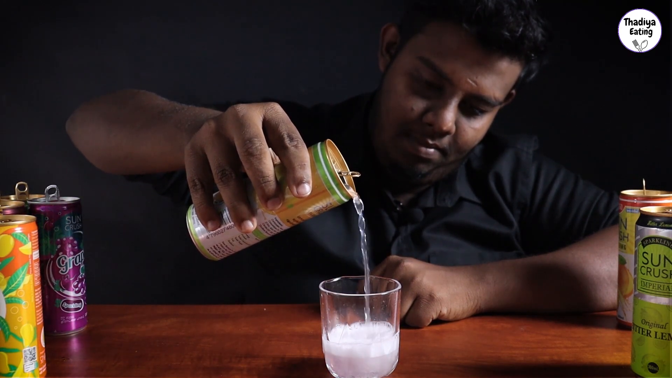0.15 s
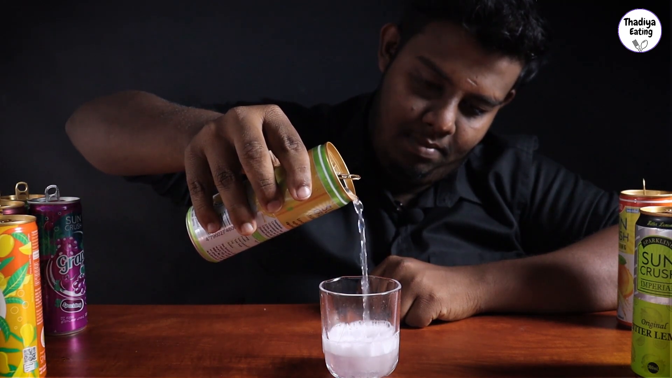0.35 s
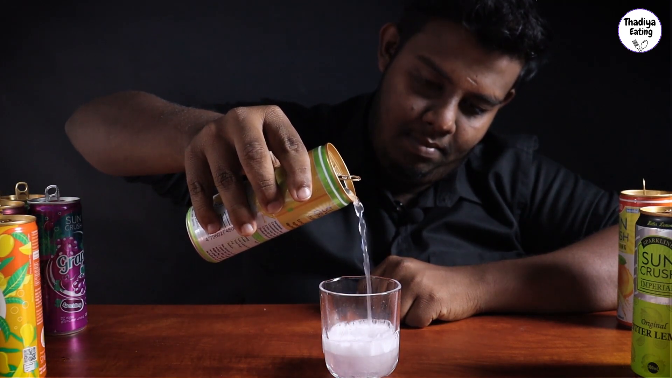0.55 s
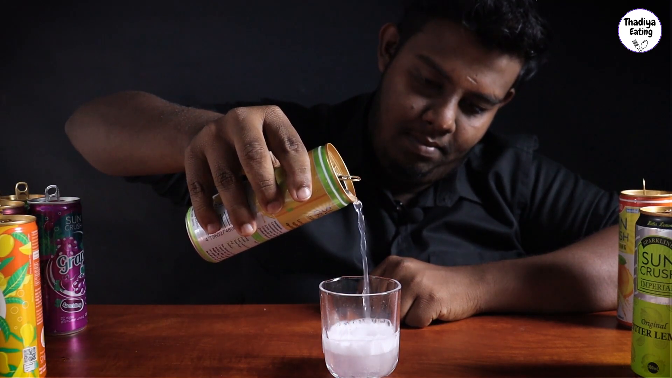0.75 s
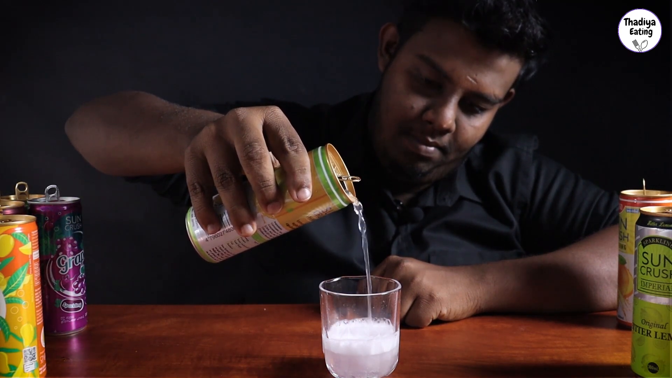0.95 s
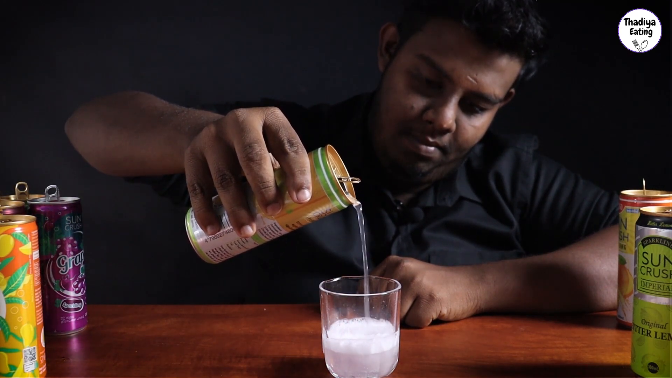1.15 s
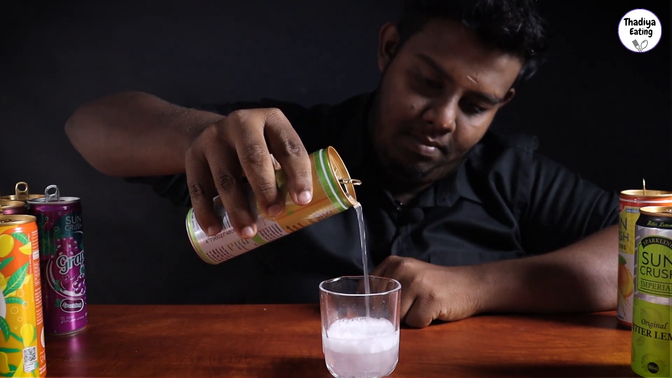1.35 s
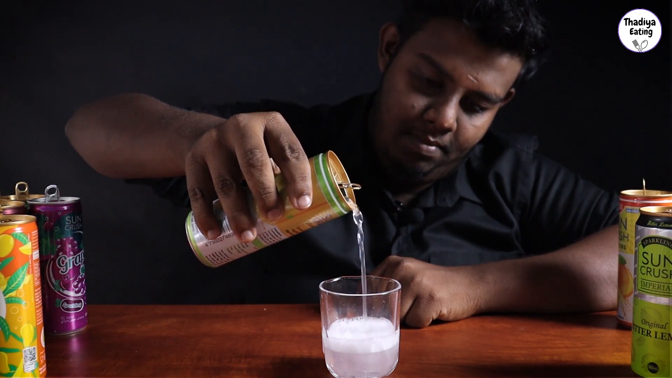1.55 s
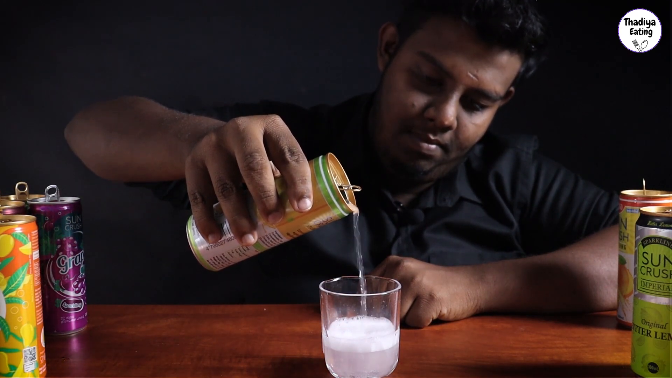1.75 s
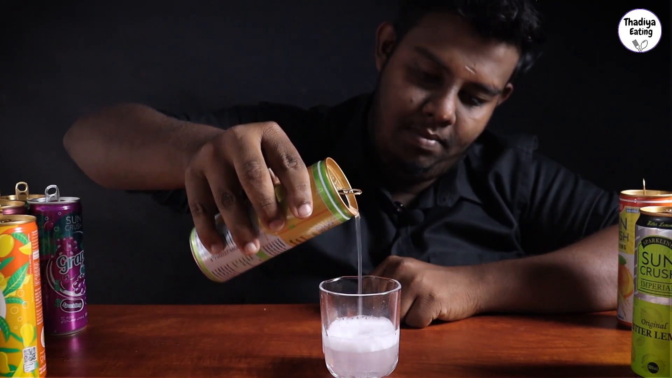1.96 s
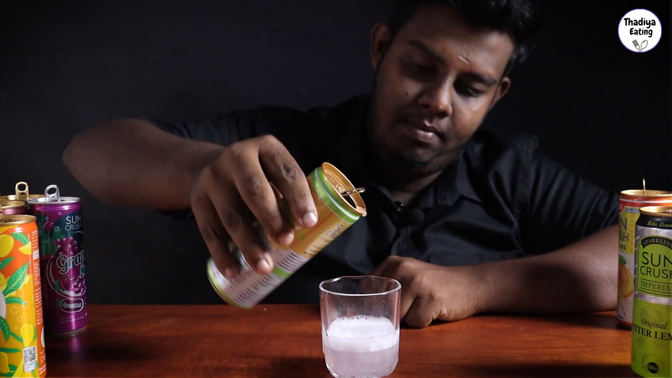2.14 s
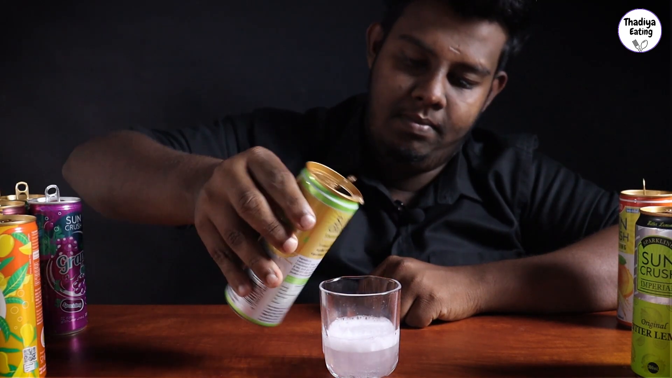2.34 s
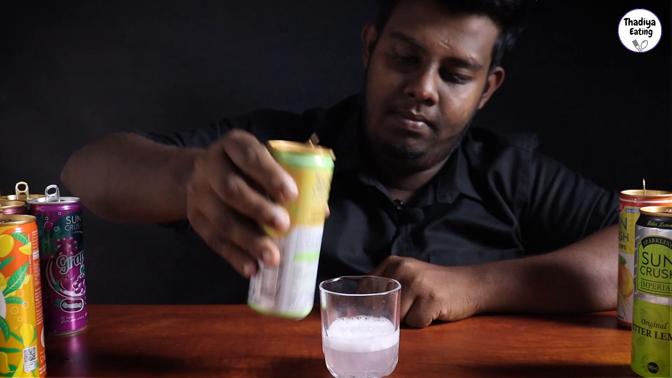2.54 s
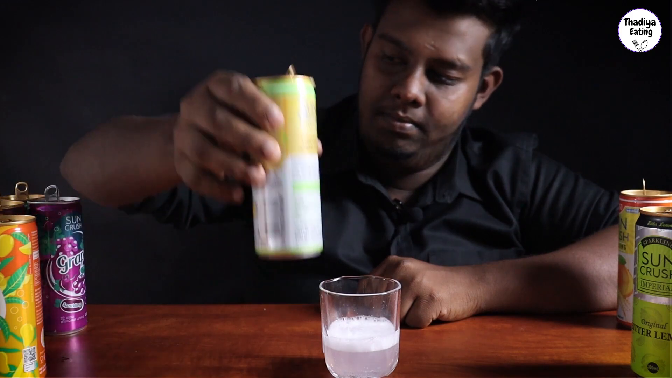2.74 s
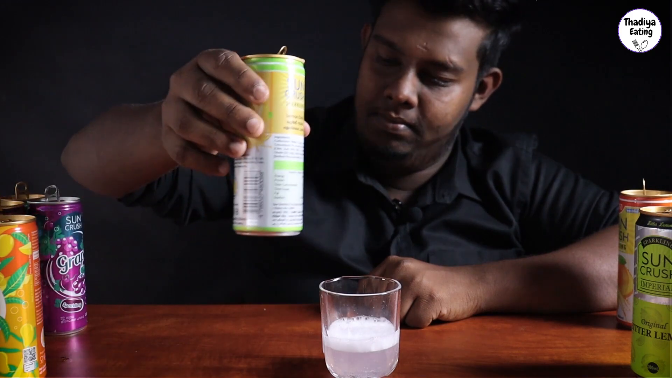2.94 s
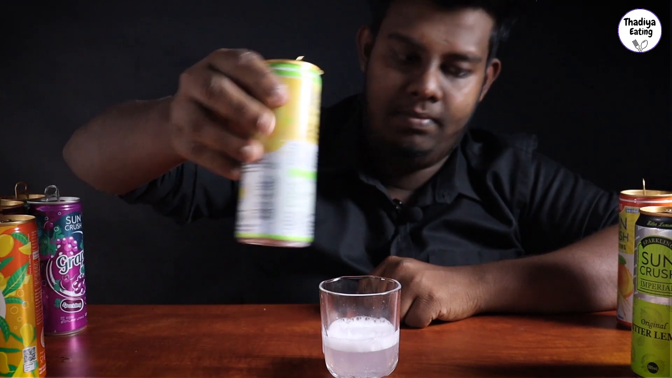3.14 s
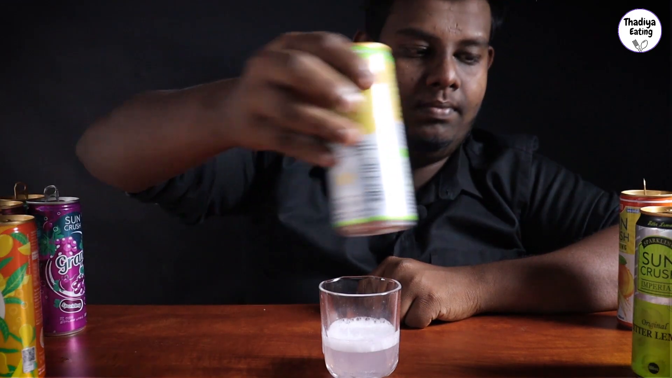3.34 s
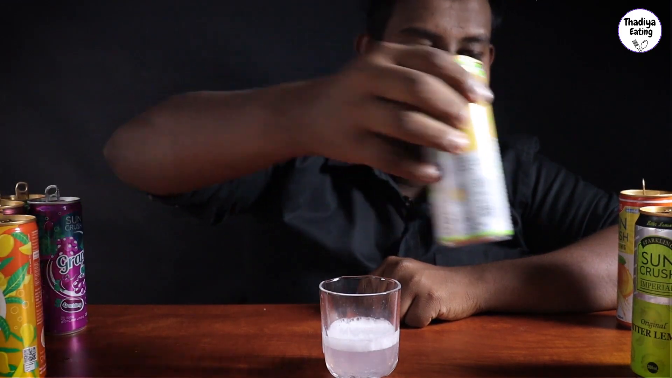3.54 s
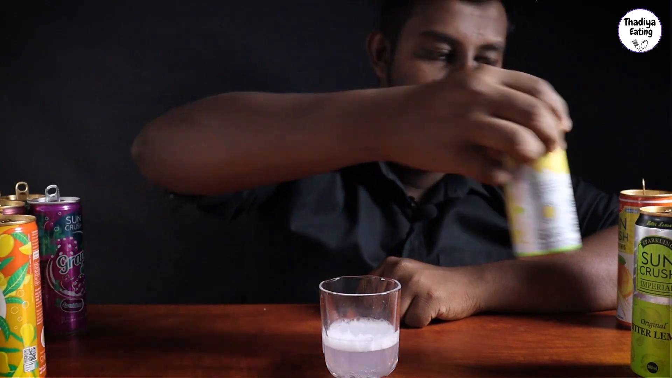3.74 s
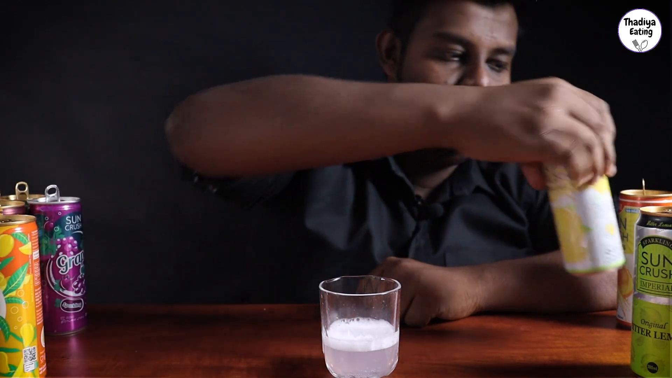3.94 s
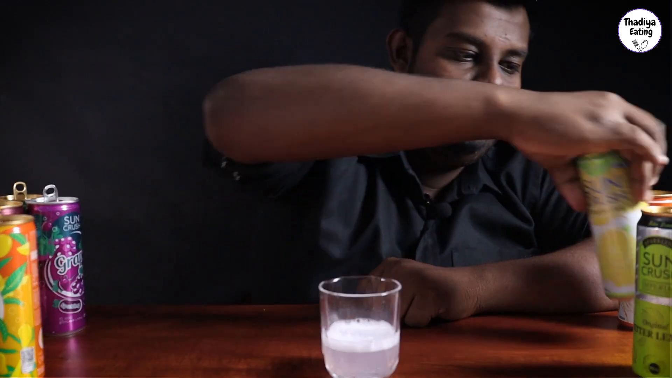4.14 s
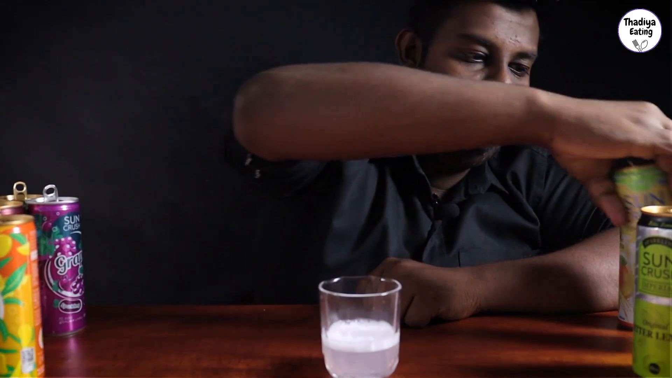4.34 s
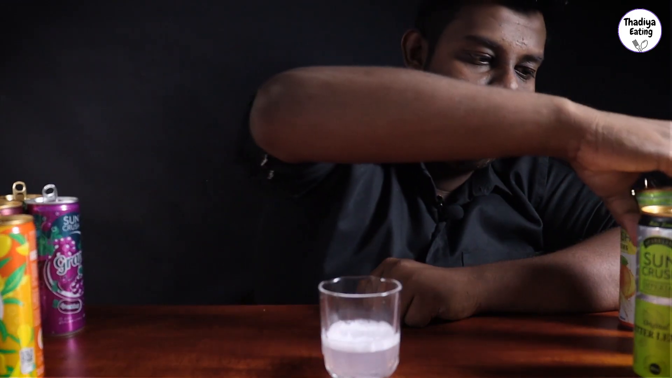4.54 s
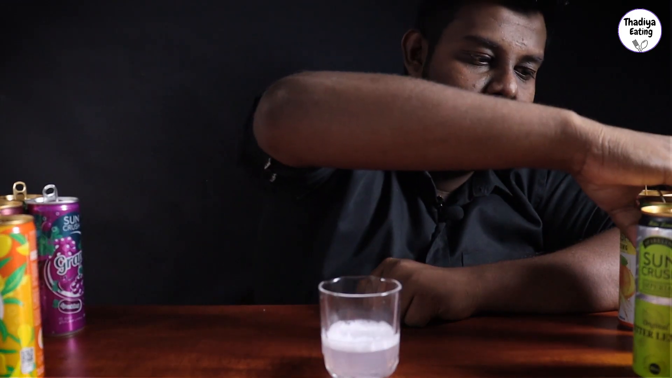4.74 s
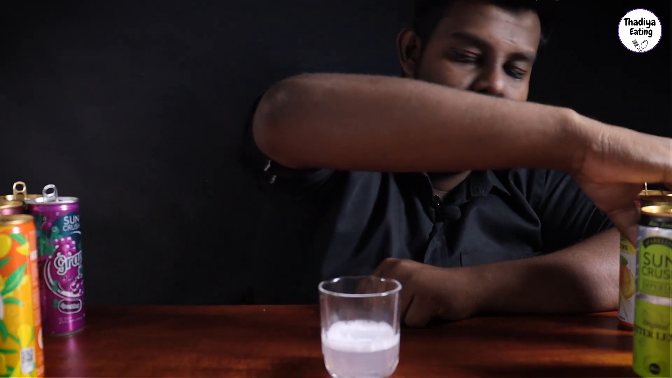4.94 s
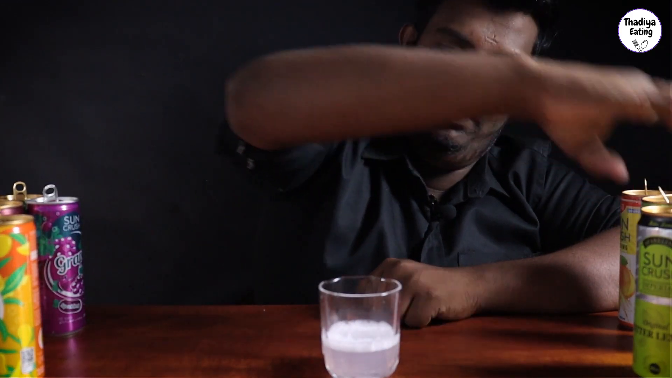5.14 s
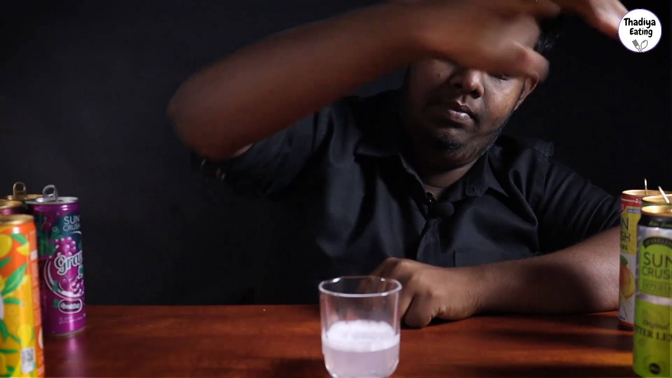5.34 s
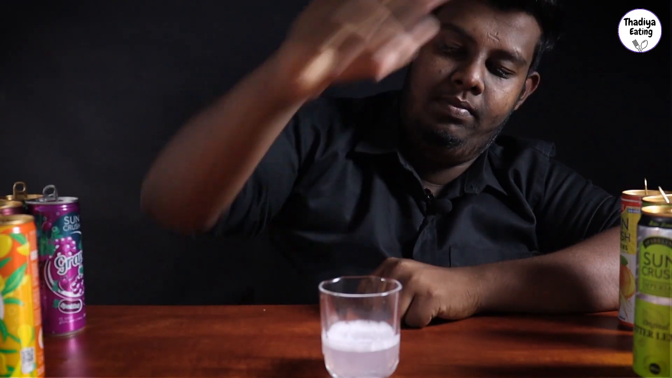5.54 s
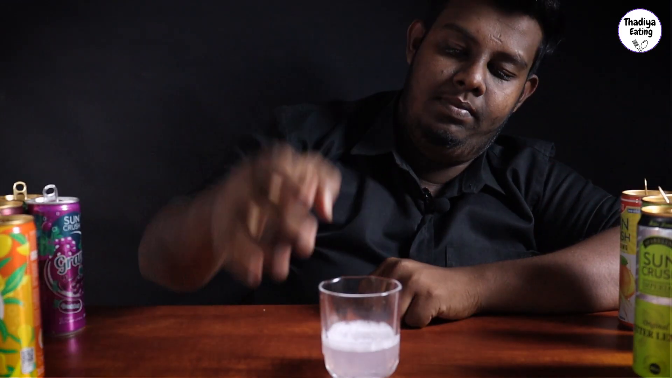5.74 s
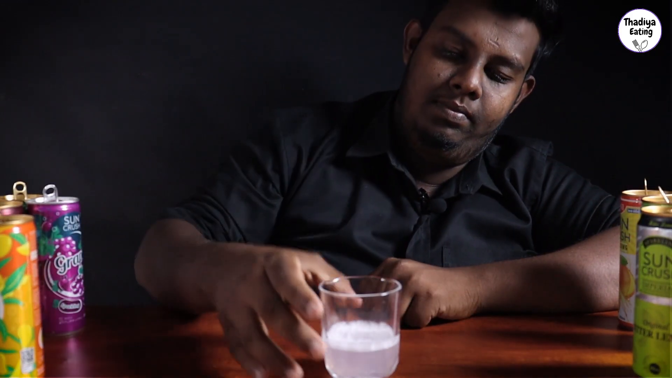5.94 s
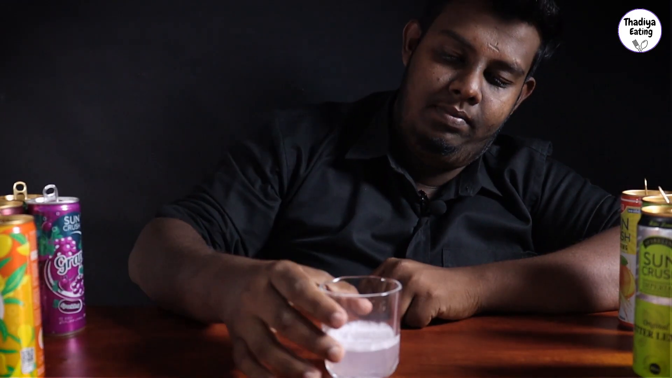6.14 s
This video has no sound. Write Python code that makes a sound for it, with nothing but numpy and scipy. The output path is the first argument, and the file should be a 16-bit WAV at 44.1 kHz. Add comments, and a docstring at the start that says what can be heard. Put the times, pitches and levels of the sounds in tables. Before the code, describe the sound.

Bubbly pouring with crisp fizz thins out and ends, a hollow tinny double click follows, then a loud can-on-wood knock that rings briefly.

```python
"""Soda runs from a can into a half-full tumbler: trapped air plops and small bubbles ring under fizzing foam.
The stream breaks off and its last bubbles die away; then the can's thin wall pops back in two steps.
The can lands hard on a wooden table in quick contacts, its rim chatters and the table rings on.
It settles once more, and a few faint soft tones follow. Room noise and a rustling shirt lie underneath.
A small room answers the sounds, and the recorder's limiter ducks loud moments such as the knock."""
import sys
import numpy as np
from scipy import signal
from scipy.fft import rfft, irfft, next_fast_len
from scipy.io import wavfile
from scipy.ndimage import uniform_filter1d, minimum_filter1d, map_coordinates

SR = 44100
rng = np.random.default_rng(int(sys.argv[2]) if len(sys.argv) > 2 else 0)


def transcribe(signal):
    """Save signal, clipped to [-1, 1], as a 16-bit WAV file at the path in sys.argv[1]."""
    frames = np.atleast_2d(signal).T
    limited = np.clip(frames, -1, 1)
    pcm = np.round(limited * 32767).astype(np.int16)
    wavfile.write(sys.argv[1], SR, pcm)


N = 272979  # length of the scene in samples

# Table levels are relative: the functions below add trims and filters to them.
# Room noise: [f/Hz, level/dB per Hz]
AIR_SPECTRUM = [(20, -13), (60, -6), (130, -7.5), (260, -6.5), (450, -11), (800, -15.5), (1100, -17),
                (1400, -10.5), (1900, -20.5), (2600, -27.5), (3800, -22.5), (6000, -22.5), (8500, -24.5),
                (11500, -26.5), (16000, -34.5)]
# Low rumble: [f/Hz, level/dB per Hz]
RUMBLE_SPECTRUM = [(20, -9), (38, -8), (70, -11.5), (150, -58.5), (400, -100)]
# Arm movements that rustle the shirt: [t/s of the peak, width/s (standard deviation), level/dB]
ARM_MOVES = [(2.4, .3, -68), (3.378, 0.12, -61), (4.25, .4, -60), (5.145, 0.33, -62), (5.733, 0.24, -61.5)]
# Colour of the shirt's rustle: [f/Hz, level/dB per Hz]
CLOTH_SPECTRUM = [(60, -2.5), (130, 10.5), (300, 13), (700, 2.5), (2500, -1.5), (6500, -5.5),
                  (11000, -14.5), (15000, -12)]
# Strength of the stream, surging as the can gulps air: [t/s, level/dB]
STREAM_FLOW = [(0, -36), (0.3, -34), (0.56, -36.5), (0.76, -39.1), (0.86, -40), (1.02, -45), (1.07, -37),
               (1.14, -37.5), (1.19, -48), (1.3, -44.5), (1.42, -41), (1.5, -46.5), (1.64, -44.5),
               (1.71, -44), (1.83, -41.5), (1.93, -51.5), (2.18, -57)]
# Large air pockets trapped by the stream: [t/s, low mode level/dB, high mode level/dB, low mode f/Hz]
LARGE_POCKETS = [(0.1061, -18, -13, 580), (0.1128, -20, -33, 603), (.1328, -26, -22, 606),
                 (.145, -21, -22.5, 580), (0.225, -18, -21, 580), (.3473, -22, -26.5, 770),
                 (0.4612, -11, -12, 604), (0.4952, -24, -47, 543), (0.6008, -27, -21.5, 570),
                 (0.6414, -22.5, -33, 626), (0.7031, -25, -19, 635), (.787, -20.5, -25, 620),
                 (0.8884, -24.5, -36, 576), (.893, -38, -23.5, 625), (0.9245, -28.5, -27.5, 590),
                 (0.964, -35, -26.5, 560), (0.983, -28.5, -23.5, 694), (0.9997, -52, -29, 660),
                 (1.2091, -38.5, -30.5, 550), (1.329, -43, -35, 605), (1.355, -19.5, -22.5, 875),
                 (1.3735, -24, -36, 910), (1.5404, -31, -32.5, 626), (1.5758, -30.5, -20, 560),
                 (1.6822, -43, -40, 690), (1.7339, -33, -27.5, 720), (1.7845, -25.5, -26, 483),
                 (1.8007, -28.5, -28, 516), (1.839, -31, -31, 497), (1.993, -57, -32, 690),
                 (2.0362, -41.5, -33.5, 603), (2.178, -55, -38.5, 550)]
# Bursting foam: [f/Hz, level/dB per Hz]
FIZZ_SPECTRUM = [(1800, -20.5), (2900, -23), (3800, 10), (4400, -3), (5000, 1.5), (6500, -9), (8500, 1.5),
                 (9400, 0.5), (11000, -12), (13000, 2.5), (15500, -13.5)]
# Resonances of the air in can and glass: [f/Hz, width/Hz, level/dB]
HOLLOW_MODES = [(210, 11, 7.5), (285.5, 40, -5), (479.9, 13, 0.5), (508.5, 13, 1.5)]
# Tiny sharp ticks: [t/s, level/dB, f/Hz]
TICKS = [(0.1062, -30, 4900), (0.168, -32.5, 8600), (0.255, -53, 4000), (0.4604, -26, 13700),
         (0.4612, -29, 8600), (0.7033, -37.5, 4500), (0.9647, -40, 3720), (1.4027, -38, 13200),
         (1.7662, -37, 12800), (5.5164, -41, 4500)]
# The can wall springs back in two steps: [t/s, push level/dB, metal level/dB]
WALL_POPS = [(2.7252, -8, -5.5), (2.7345, -1.5, -14.5)]
# Ringing modes of the can's shell and of the air inside it: [f/Hz, level/dB, t60/s]
CAN_MODES = [(265, -9, .07), (608, -22, .28), (1180, -33, .25), (2200, -12.5, .105), (2616, -36, .1),
             (2724, -46, .22), (3262, -34, .1), (3704, -43, .08), (4950, -41, .07), (6121, -41, .12),
             (7036, -40, .13), (7250, -41, .12), (9313, -42, .15), (9630, -42, .1), (14430, -45, .08)]
# Colour of the wall's snap: [f/Hz, level/dB per Hz]
SNAP_SPECTRUM = [(100, -13.5), (250, 14.5), (650, 6), (1000, 10.5), (1600, -8.5), (2400, -8.5), (4300, -24),
                 (5500, -6), (7500, -5.5), (8500, -21.5), (15000, -21)]
# Contacts of can and table: [t/s, peak level/dB, crack level/dB against the thud]
CONTACTS = [(4.808, 11.5, 2), (4.8132, 5.5, -9), (4.8183, 3.5, -19.5), (5.033, -30.5, -10)]
# Colour of the hard contact: [f/Hz, level/dB per Hz]
CRACK_SPECTRUM = [(60, -24.5), (200, -9), (550, 3.5), (1000, -2), (1500, -12), (2000, -18.5), (3000, -26.5),
                  (4500, -38.5), (6000, -35.5), (9000, -57.5), (16000, -52)]
# Ringing modes of the table top and what stands on it: [f/Hz, level/dB, t60/s]
TABLE_MODES = [(212, -24, 0.45), (330, -24, 0.39), (388, -21, 0.37), (482, -33, 0.51), (558, -15.5, 0.15),
               (612, -27.5, 0.4), (727, -18, 0.47), (807.6, -19.5, 0.46), (915, -29, .45),
               (1017, -21.5, 0.24), (1143, -33, .4), (1475, -37.5, 0.39), (1841, -31, 0.22),
               (2650, -41, 0.17), (3580, -35, 0.11), (6000, -33, 0.07)]
# Dense ringing of the table: [f/Hz, level/dB per Hz]
RATTLE_SPECTRUM = [(41, -54.5), (70, -18.5), (118, -8), (166, -10.5), (200, -13.5), (285, -19.5),
                   (327, -13), (552, 1.5), (843, -7), (902, -13.5), (4000, -57.5), (5200, -82.5),
                   (8800, -120)]
# Colour of the rocking rim: [f/Hz, level/dB per Hz]
CHATTER_SPECTRUM = [(300, -19), (700, 13), (1200, 5.5), (1600, -9), (1900, -7), (2250, -26.5),
                    (2700, -15.5), (3400, -36), (5000, -46), (12000, -65.5)]
# Faint soft tones: [t/s of the peak, width/s (standard deviation), f/Hz at the peak, glide/Hz per s, level/dB]
SOFT_TONES = [(5.135, 0.049, 337, -82, -41), (5.426, 0.053, 349.4, -4, -47),
              (5.854, 0.039, 423.6, 86, -44.5), (5.993, .02, 424, 0, -57.5),
              (6.175, 0.027, 496, 701.5, -53.5)]
# How long the room's diffuse tail lasts: [f/Hz, t60/s]
ROOM_DECAY = [(100, .5), (400, 0.34), (1500, 0.25), (5000, 0.25), (14000, 0.18)]
# Low room modes: [f/Hz, width/Hz, level/dB]
ROOM_MODES = [(89, 5, 4), (120, 6, 3), (203.9, 5, 2.5), (282, 35, -8.5), (405, 6.8, -7.5), (430, 6, -4.5),
              (477, 15, -0.5), (570, 9, -8.5), (620, 3.3, -11)]

POCKET_HZ, POCKET_SPREAD = 1392, 0.028  # high mode of large and dribbling pockets, and its relative scatter
GLASS_AIR_HZ = 507  # the air above the drink
SPLASH_DB = -27  # spray of a large pocket, against the high mode in its table row
DRIBBLE_PER_S, DRIBBLE_SPREAD = 45, 0.2  # small pockets: average rate, relative scatter of the low mode
DRIBBLE_DB, DRIBBLE_SCATTER_DB = 4, 1.5  # small pockets: overall gain, scatter in level
FULL_FLOW_DB, HIGH_FOLLOWS = -38, 0.62  # highs follow only this share of each dB away from full flow
STOP_S, DRAIN_DB_PER_S = 2.2, 44  # when the stream breaks off, and how fast the last bubbles die away
ROCK_DB, ROCK_RISE_S = -28, 0.012  # the can rocks on its rim: level and build-up
ROCK_HOLD_S, ROCK_FADE_DB_PER_S = 0.077, 217  # fade starts this long after landing, at this speed
LEAD = 64  # samples left for a puff to build up
TOP_HZ = 15900  # the recorder keeps nothing from here up


def amp(db):
    """Decibels to gain."""
    return 10 ** (np.asarray(db) / 20)


def unit(x):
    """Scale to an rms (average strength) of 1."""
    return x / np.sqrt(np.mean(x ** 2) + 1e-20)


def along(points, hz):
    """Read a curve of (Hz, value) points at hz, on a log frequency axis."""
    f, values = np.transpose(points)
    return np.interp(np.log(hz + 1), np.log(f + 1), values)


def wobble(rate):
    """A smooth random curve through rate random points a second."""
    knots = rng.standard_normal(int(N * rate / SR) + 4)
    return map_coordinates(knots, [np.arange(N) * rate / SR])


def filtered(x, response):
    """Multiply the spectrum of x by a response that depends on frequency."""
    size = next_fast_len(len(x) + SR // 2)
    hz = np.fft.rfftfreq(size, 1 / SR)
    return irfft(rfft(x, size) * response(hz), size)[:len(x)]


def noise(spectrum, size=N):
    """Coloured noise of rms 1."""
    return unit(filtered(rng.standard_normal(size), lambda hz: amp(along(spectrum, hz))))


def high_pass(x, hz, order):
    """Weaken what lies under hz."""
    return signal.sosfilt(signal.butter(order, hz, "high", fs=SR, output="sos"), x)


def resonate(x, modes):
    """Let x drive a set of resonances, each strongest at its own centre frequency."""
    def response(f):
        total = 0
        for centre, width, db in modes:
            damping = 1j * f * width
            total = total + amp(db) * damping / (centre ** 2 - f ** 2 + damping)
        return total
    return filtered(x, response)


def add(track, s, sound):
    """Mix a sound into the track at time s, cut off where the track ends."""
    room_left = track[max(round(s * SR), 0):][:len(sound)]
    room_left += sound[:len(room_left)]


def swelling(s, width_s):
    """A bell-shaped gain that peaks at time s."""
    return np.exp(-0.5 * ((np.arange(N) / SR - s) / width_s) ** 2)


def blip(t, hz, swell):
    """A heavily damped oscillation whose envelope reaches 1 after swell seconds."""
    envelope = t / swell * np.exp(1 - t / swell)
    return np.sin(2 * np.pi * hz * t) * envelope


def burst(spectrum, t60):
    """A coloured puff of noise that starts at about rms 1, LEAD samples in, and dies away."""
    t = np.arange(SR // 8) / SR
    puff = rng.standard_normal(len(t)) * amp(-60 * t / t60)
    return filtered(np.pad(puff, (LEAD, 0)), lambda hz: unit(amp(along(spectrum, hz))))


def ring(t, modes):
    """Freely decaying modes, each set off in a random direction."""
    out = np.zeros(len(t))
    for hz, db, t60 in modes:
        out += rng.choice([-1, 1]) * amp(db - 60 * t / t60) * np.sin(2 * np.pi * hz * t)
    return out


def dying(x, decay):
    """Each frequency of x fades by 60 dB in its own t60."""
    hz, t, cells = signal.stft(x, SR, nperseg=256)
    faded = cells * amp(-60 * t / along(decay, hz)[:, None])
    return signal.istft(faded, SR, nperseg=256)[1][:len(x)]


def room_noise():
    """Steady coloured air noise and thin top hiss, over a rumble of uneven strength."""
    air = amp(-59.5) * noise(AIR_SPECTRUM)
    lumps = amp(9 * np.tanh(wobble(14)))
    rumble = amp(-68.5) * unit(noise(RUMBLE_SPECTRUM) * lumps)
    hiss = amp(-63.0) * noise([(11900, -64.5), (12300, 6.5), (15800, 1.5)])
    return air + rumble + hiss


def shirt():
    """Cloth rubs as the arm moves: flickering noise that swells with each movement."""
    power = sum((amp(db) * swelling(s, width_s)) ** 2 for s, width_s, db in ARM_MOVES)
    return np.sqrt(power) * noise(CLOTH_SPECTRUM) * amp(2 * wobble(25))


def pocket(low, high, low_hz, high_hz, air_db=-4, low_swell=0.00113, high_swell=0.0014):
    """An air pocket rings briefly in two modes, damped by the foam, and pushes the air above the drink."""
    t = np.arange(SR // 25) / SR
    low_mode = amp(low) * blip(t, low_hz, low_swell)
    high_mode = amp(high) * blip(t, high_hz, high_swell)
    glass_air = amp(low + air_db) * blip(t, GLASS_AIR_HZ, low_swell)
    return low_mode + high_mode + glass_air


def dribble(low_db, high_db, hz=620, low_offset_db=-4, count=120):
    """The rippling stream traps small pockets at uneven intervals; their strength follows the flow."""
    out = np.zeros(N)
    times = np.cumsum(rng.uniform(0.4, 1.6, count)) / DRIBBLE_PER_S
    for s, (low, high, low_pitch, high_pitch) in zip(times, rng.standard_normal((count, 4))):
        i = min(int(s * SR), N - 1)
        low_level = low_db[i] + low_offset_db + DRIBBLE_SCATTER_DB * np.tanh(low)
        high_level = high_db[i] + DRIBBLE_SCATTER_DB * np.tanh(high)
        low_hz = hz * np.exp(DRIBBLE_SPREAD * low_pitch)
        high_hz = POCKET_HZ * np.exp(POCKET_SPREAD * high_pitch)
        add(out, s, pocket(low_level, high_level, low_hz, high_hz))
    return amp(DRIBBLE_DB) * out


def swarm(hz, spread, swell, scatter_db, count):
    """Many small bubbles ring at random times, with scattered pitch and strength; rms 1."""
    out, t = np.zeros(N), np.arange(SR // 40) / SR
    times = rng.random(count) * N / SR
    for s, (pitch, size) in zip(times, rng.standard_normal((count, 2))):
        add(out, s, amp(scatter_db * np.tanh(size)) * blip(t, hz * np.exp(spread * pitch), swell))
    return unit(out)


def plops(low_db=-2, high_db=0.0):
    """Each large pocket rings and throws a short noisy splash, the stronger its high mode the louder."""
    out, t = np.zeros(N), np.arange(SR // 25) / SR
    for s, low, high, low_hz in LARGE_POCKETS:
        high_hz = POCKET_HZ * np.exp(POCKET_SPREAD * rng.standard_normal())
        splash_shape = (t / 0.001) * amp(-60 * t / 0.011)
        spray = amp(high + SPLASH_DB) * noise(FIZZ_SPECTRUM, size=len(t)) * splash_shape
        add(out, s + 0.0005, pocket(low + low_db, high + high_db, low_hz, high_hz) + spray)
    return out


def pour(cut_hz=465, treble_db=-1.5):
    """Plops over a swarm of small bubbles; the foam fizzes with the flow and dies down after it."""
    t = np.arange(N) / SR
    flow_s, flow_levels = np.transpose(STREAM_FLOW)
    flow_db = np.interp(t, flow_s, flow_levels)
    stop_db = -DRAIN_DB_PER_S * np.maximum(t - STOP_S, 0)
    low_db = flow_db + stop_db
    high_db = FULL_FLOW_DB + treble_db + HIGH_FOLLOWS * (flow_db - FULL_FLOW_DB) + stop_db
    low = amp(low_db - 3) * swarm(hz=642, spread=0.27, swell=0.0012, scatter_db=6, count=1300)
    high = amp(high_db - 8) * swarm(hz=1430, spread=0.053, swell=0.00093, scatter_db=5.5, count=700)
    bubbles = plops() + dribble(low_db, high_db) + low + high
    crackle = amp(7.1 * wobble(500))  # fast random swings in the foam's level
    fizz = amp(high_db - 25) * unit(noise(FIZZ_SPECTRUM) * crackle)
    # the small mouth of the glass radiates little bass
    return high_pass(bubbles, cut_hz, order=4) - resonate(bubbles, HOLLOW_MODES) + fizz


def spits():
    """Single tiny bursts: very short puffs of noise, each brightest around its own frequency."""
    out = np.zeros(N)
    for s, db, hz in TICKS:
        peak = [(hz / 2, -28), (hz, 0), (hz * 2, -34)]
        add(out, s + 0.001 - LEAD / SR, amp(db - 7.0) * burst(peak, t60=0.012))
    return out


def can_pop(push_hz=415, swell=0.0013, ring_db=-5):
    """The dented wall snaps out: it pushes the air in the can and rings the shell and the air inside it."""
    out, t = np.zeros(N), np.arange(SR // 2) / SR
    soft_start = 1 - np.exp(-t / 0.00041)
    add(out, WALL_POPS[0][0], amp(ring_db) * ring(t, CAN_MODES) * soft_start)
    for s, push_db, metal_db in WALL_POPS:
        add(out, s, amp(push_db) * blip(t, push_hz, swell))
        add(out, s - LEAD / SR, amp(metal_db - 17.0) * burst(SNAP_SPECTRUM, t60=0.07))
    return high_pass(out, 210, order=3)


def knock(thud_hz=530, swell=0.0013):
    """The can's rim lands in quick contacts and chatters; the table rings on, and the can settles once more."""
    out, t = np.zeros(N), np.arange(SR) / SR
    landing_s, settling_s = CONTACTS[0][0], CONTACTS[-1][0]
    for s, db, crack_db in CONTACTS:
        contact = amp(crack_db) * burst(CRACK_SPECTRUM, t60=0.02)
        add(contact, LEAD / SR, blip(t, thud_hz, swell))
        add(out, s - LEAD / SR, amp(db) * contact / np.abs(contact).max())
    dense_decay = [(120, 0.82), (600, 0.5), (1500, 0.53), (3000, 0.27)]  # (Hz, t60 in s)
    dense = dying(noise(RATTLE_SPECTRUM, size=len(t)), dense_decay)
    soft_start = 1 - np.exp(-t / 0.0028)
    add(out, landing_s, (amp(3) * ring(t, TABLE_MODES) + amp(-14.5) * dense) * soft_start)
    add(out, settling_s, amp(-30.0) * ring(t, [(358, 6.0, 0.079), (401, 0, 0.25)]))
    since = np.arange(N) / SR - landing_s
    fade_db = ROCK_FADE_DB_PER_S * np.maximum(since - ROCK_HOLD_S, 0)
    rocking = np.clip(since / ROCK_RISE_S, 0, 1) * amp(ROCK_DB - fade_db)
    chatter = rocking * unit(noise(CHATTER_SPECTRUM) * amp(4 * wobble(220)))
    return high_pass(out + chatter, 70, order=2)


def soft_tones(waver=0.95, flutter_db=4.5):
    """Faint, nearly pure tones that swell, waver in pitch and level, and fade."""
    out, t = np.zeros(N), np.arange(N) / SR
    for s, width_s, hz, glide, db in SOFT_TONES:
        since = t - s
        phase = 2 * np.pi * (hz * since + glide * since ** 2 / 2) + waver * wobble(24)
        out += swelling(s, width_s) * amp(db + flutter_db * wobble(60)) * np.sin(phase)
    return out


def room(x, gap=0.005):
    """The diffuse answer of the walls: a fading noise tail, drawn anew for each quarter second of x."""
    wet = np.zeros(N)
    for start in range(0, N, SR // 4):
        tail = dying(rng.standard_normal(SR // 2), ROOM_DECAY)
        tail /= np.linalg.norm(tail)
        add(wet, start / SR + gap, signal.fftconvolve(x[start:start + SR // 4], tail))
    return wet


def scene():
    """Mix the direct sounds with the background; the room answers with low modes and a diffuse tail."""
    background = room_noise() + shirt()
    drink = pour() + spits()
    pop = can_pop()
    table = knock()
    to_walls = amp(-10) * drink + amp(-9.0) * pop + amp(-16.5) * table
    walls = high_pass(room(to_walls), 330, order=2)
    boom = resonate(drink + pop + amp(-7) * table, ROOM_MODES)
    return (drink + pop + table + walls + boom + soft_tones() + background)[None]


def record(dry, ceiling_db=1, release_db=80):
    """A limiter ducks quickly and recovers by release_db a second; remaining peaks are rounded off."""
    x = dry[0]
    recovery = release_db * np.arange(N) / SR
    excess = np.maximum(20 * np.log10(np.abs(x) + 1e-9) - ceiling_db, 0)
    # the running maximum holds the deepest duck while the recovery line lifts the gain again
    gain_db = recovery - np.maximum.accumulate(excess + recovery)
    smooth_db = uniform_filter1d(minimum_filter1d(gain_db, size=44), size=44)  # about 1 ms each
    x = x * amp(smooth_db)
    clipped = x / (1 + x ** 8) ** (1 / 8)
    return filtered(clipped, lambda hz: hz < TOP_HZ)[None]


dry = scene()
out = record(dry)
transcribe(out)
```